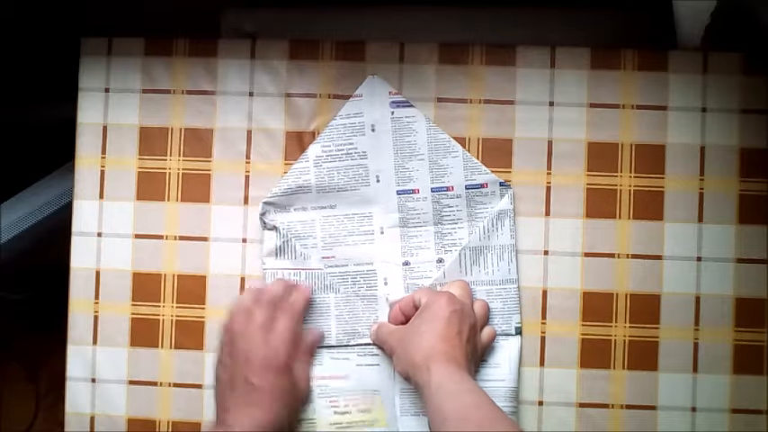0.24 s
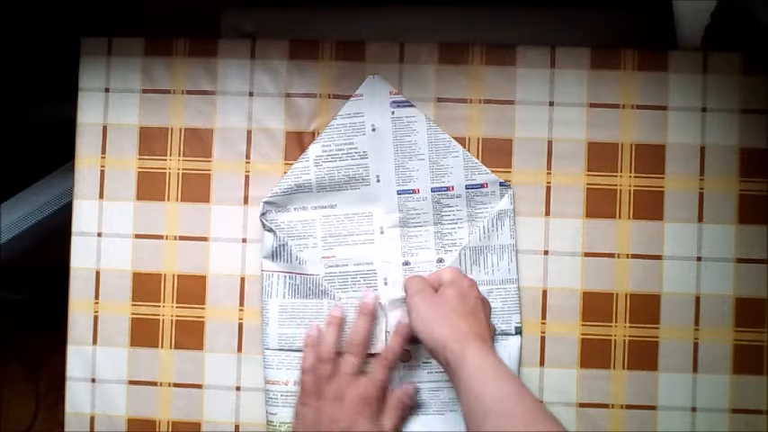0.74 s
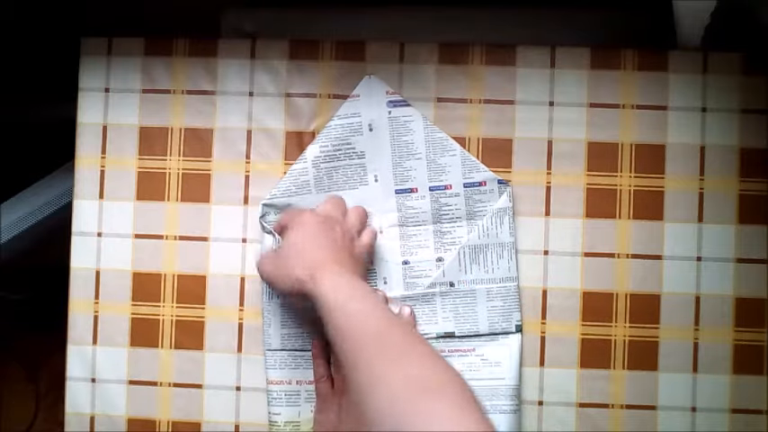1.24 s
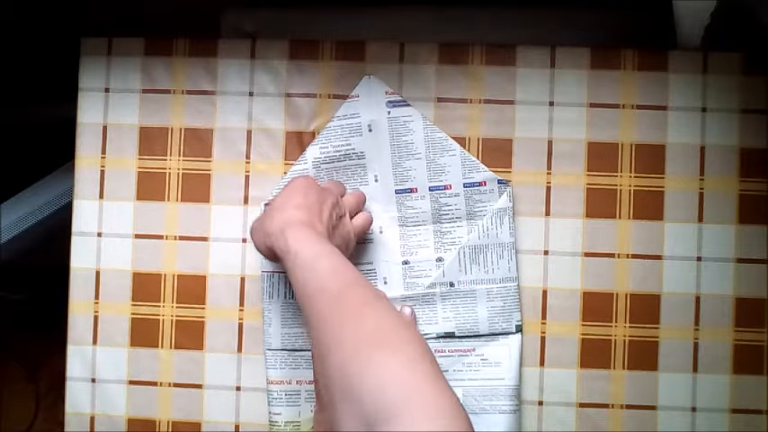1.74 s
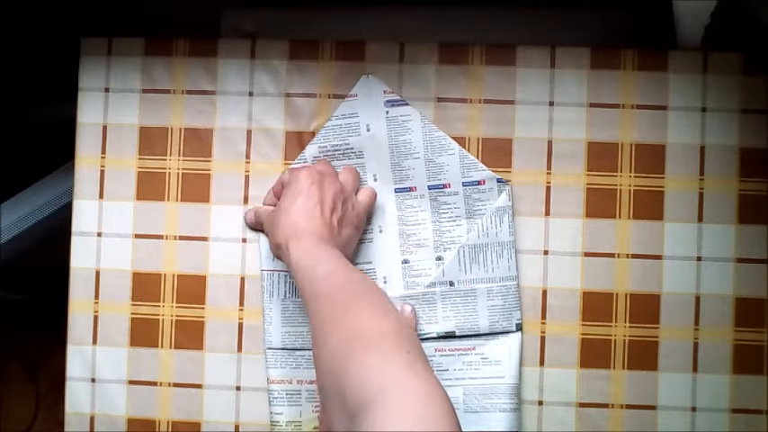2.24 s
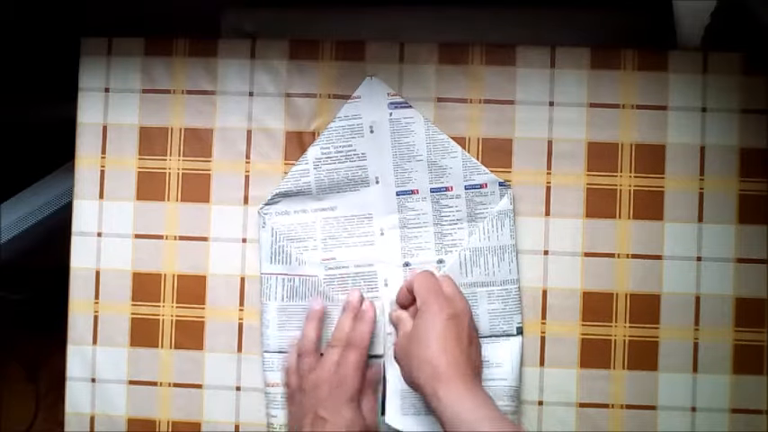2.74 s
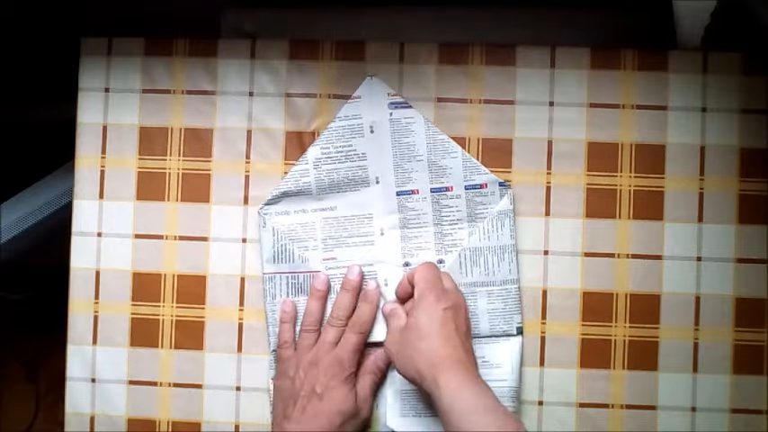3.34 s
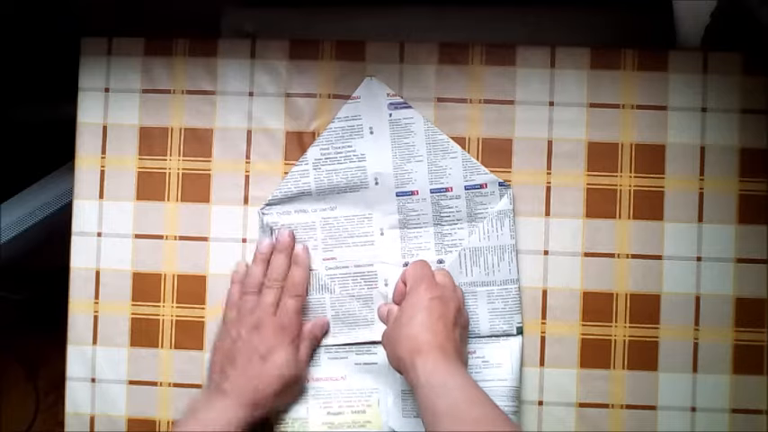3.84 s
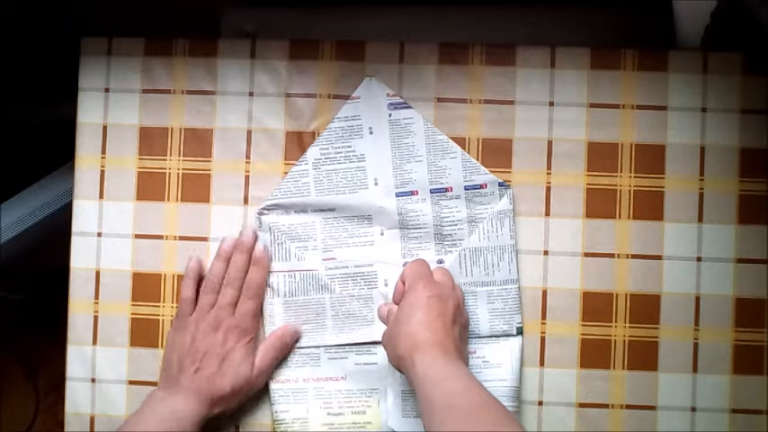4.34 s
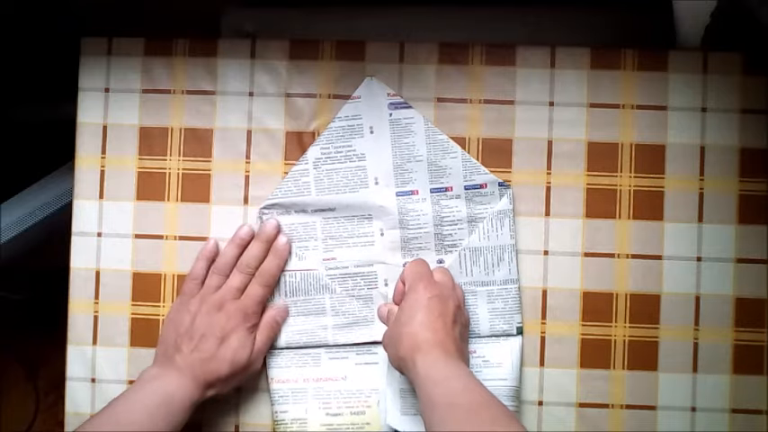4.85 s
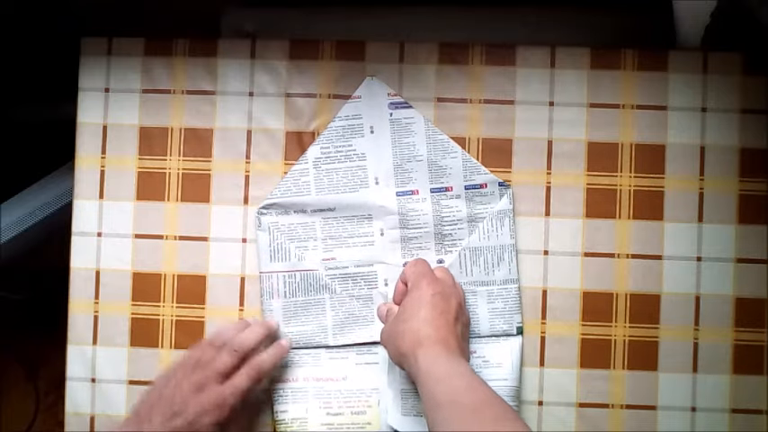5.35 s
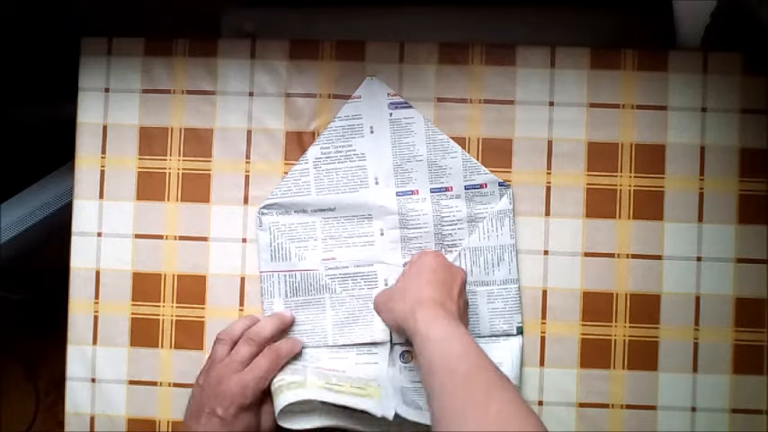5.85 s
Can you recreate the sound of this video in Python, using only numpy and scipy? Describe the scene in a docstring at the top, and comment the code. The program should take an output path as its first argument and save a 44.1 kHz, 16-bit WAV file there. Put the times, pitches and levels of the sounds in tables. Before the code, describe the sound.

Newspaper sheets rustle, crinkle and snap as hands fold and smooth them on a wooden table, with soft thuds in a small room.

```python
"""Paper rustles, crackles and snaps over soft thuds: hands fold and smooth a newspaper on a wooden table.
Sliding palms are bright noise, buckling creases short rings, snaps filtered noise bursts.
Flapping sheets are dull noise with hollow resonances; hands thud and rub on ringing table modes.
A small room adds echoes and a room tone; the microphone is dull above 7 kHz and hisses faintly."""
import sys
import numpy as np
from scipy import signal
from scipy.fft import rfft, irfft, next_fast_len
from scipy.io import wavfile

SR = 44100
rng = np.random.default_rng(int(sys.argv[2]) if len(sys.argv) > 2 else 0)


def transcribe(u):
    """Save the signal u as a 16-bit wav file named by the first command-line argument.

    u: samples, shape (n,) or (channels, n), limited to [-1, 1]; the rate is SR.
    q: integer samples, one column per channel.
    """
    v = np.clip(np.atleast_2d(u).T, -1, 1)
    q = np.round(v * 32767).astype(np.int16)
    wavfile.write(sys.argv[1], SR, q)


N = 268348
TIME_S = np.arange(N) / SR


def from_db(db):
    """Decibels to amplitude gain."""
    return 10 ** (np.asarray(db) / 20)


def rms_one(x):
    """Scale to rms 1."""
    return x / np.sqrt(np.mean(x ** 2) + 1e-20)


def drift(rate_hz):
    """Slow random curve, rms 1: noise through two equal one-pole low-passes, at 1/20 of the sample rate."""
    pole = np.exp(-40 * np.pi * rate_hz / SR)
    noise = rng.standard_normal(N // 20 + 2002)
    slow = signal.lfilter([1], [1, -2 * pole, pole ** 2], noise)[2000:]   # drop the filter's run-in
    return np.interp(np.arange(N) / 20, np.arange(len(slow)), rms_one(slow))


def ring(x, hz, t60_s):
    """Two-pole resonator: a unit click starts a decaying sine of initial height 1."""
    radius = from_db(-60 / (t60_s * SR))
    angle = 2 * np.pi * hz / SR
    poles = [1, -2 * radius * np.cos(angle), radius ** 2]
    return signal.lfilter([0, np.sin(angle)], poles, x + 1e-18)


def band(x, low_hz, high_hz):
    """Butterworth band-pass."""
    return signal.sosfilt(signal.butter(2, [low_hz, high_hz], "band", fs=SR, output="sos"), x)


def coloured(spectrum):
    """Noise of rms 1 whose level per Hz follows the table, interpolated over log frequency."""
    hz, db = np.transpose(spectrum)
    size = next_fast_len(N)
    bins_hz = np.maximum(np.arange(size // 2 + 1) * SR / size, 1)
    shape = from_db(np.interp(np.log(bins_hz), np.log(hz), db, left=-60))
    noise = irfft(rfft(rng.standard_normal(size)) * shape, size)
    return rms_one(noise[:N])


def grains(per_s, spread_db):
    """Random clicks of either sign, in clumps, a few much larger than the rest."""
    size_db = spread_db * np.minimum(rng.exponential(1, N), 3.5)
    sizes = from_db(size_db) * rng.choice([-1, 1], N)
    chance = per_s * from_db(3 * drift(30)) / SR
    return sizes * (rng.random(N) < chance)


# room tone spectrum: (frequency [Hz], relative level per Hz [dB])
ROOM_TONE_SPECTRUM = [(25, -41), (45, -13), (118, 15.5), (240, 11), (560, -23), (1300, -5.5), (3400, -5.5),
                      (7000, -18), (15000, 0.5)]
ROOM_TONE_DB = -63.5


def room_tone():
    """Steady coloured noise of the quiet room."""
    return from_db(ROOM_TONE_DB) * coloured(ROOM_TONE_SPECTRUM)


ROOM_T60_S, ROOM_DB = 0.17, -5
PATTERN_STEP_S = 0.03


def room_echoes(x, count=8):
    """Hands keep moving, so crossfaded echo patterns take turns; each thickens, then dies away."""
    t = np.arange(round(.5 * SR)) / SR
    place = TIME_S / PATTERN_STEP_S % count
    out = 0
    for k in range(count):
        away = np.abs((place - k + count / 2) % count - count / 2)   # steps from this pattern's turn
        share = np.cos(np.pi / 2 * np.minimum(away, 1)) ** 2
        decay = from_db(-60 * t / ROOM_T60_S) * np.clip(t / 0.0024, 0, 1)
        echoes = band(rng.standard_normal(len(t)) * decay, 324, 13100)
        unit_energy = echoes / np.sqrt(np.sum(echoes ** 2))
        out = out + signal.fftconvolve(x * share, unit_energy)[:N]
    return from_db(ROOM_DB) * out


# table top modes: (frequency [Hz], relative level [dB], t60 [s])
TABLE_MODES = [(121.5, -2, 0.23), (170.3, -4.5, 0.11), (75, -27, 0.14), (230, -19, 0.51),
               (302.2, 6.5, 0.11), (331, -0.5, 0.085), (472, 1.5, 0.042)]
UPPER_MODES_HZ = 200   # modes above this depend on how hard the hand is
# hands rubbing the table top: (time [s], rumble level [dB])
RUB_LEVELS = [(0.0, -53), (0.12, -49), (0.39, -57), (0.57, -60), (0.69, -63.5), (0.91, -74), (1.18, -66),
              (1.32, -68), (1.4, -54.5), (1.49, -64), (1.61, -68), (2.01, -74.5), (2.25, -62), (2.4, -58.5),
              (2.45, -69), (2.52, -56.5), (2.64, -54.5), (2.69, -69.5), (3.2, -68), (3.37, -76),
              (3.67, -66), (3.79, -63), (3.94, -62.5), (4.18, -50.5), (4.42, -55), (4.54, -62),
              (4.77, -71.5), (5.13, -53.5), (5.27, -62), (5.64, -62), (5.72, -70), (5.98, -63.5),
              (6.08, -78)]


def table_rumble():
    """Uneven rubbing of the hands, swelling and fading, rings the table modes, the upper ones weakly."""
    rubbing = rng.standard_normal(N) * from_db(3.6 * drift(15))
    rumble = 0
    for hz, db, t60_s in TABLE_MODES:
        gain_db = db - 14.4 * (hz > UPPER_MODES_HZ)
        rumble = rumble + from_db(gain_db) * ring(rubbing, hz, t60_s)
    level_db = np.interp(TIME_S, *np.transpose(RUB_LEVELS))
    return from_db(level_db) * rms_one(rumble)


# hands landing: (time [s], strike level before mode gains [dB], hardness: relative upper-mode drive [dB])
LANDINGS = [(0.016, -29, -11.5), (0.201, -40.5, -9), (0.27, -42.5, -11), (0.452, -43, -6.5),
            (0.656, -52, -19), (1.326, -44, -17.5), (1.571, -52.5, -11), (1.947, -52.5, -13),
            (2.253, -46.5, -7), (2.417, -48, -34), (2.475, -43, -37), (2.558, -36.5, -21.5),
            (2.899, -34.5, -21), (2.914, -36, -35), (3.323, -54, -28), (3.832, -48.5, -34),
            (4.008, -36, -28), (4.044, -42, -20.5), (4.23, -42.5, -22), (4.27, -42, -36), (4.322, -38, -26),
            (4.548, -42.5, -35), (5.009, -39, -23.5), (5.17, -43.5, -23), (5.226, -43, -27),
            (5.438, -44.5, -22), (5.464, -45.5, -21), (5.665, -52.5, -20), (5.98, -52.5, -6)]


def table_thuds():
    """Soft pushes ring the table modes; hard landings wake the upper ones more."""
    time_s, strike_db, hardness_db = np.transpose(LANDINGS)
    at = np.round((time_s - .004) * SR).astype(int)   # start 4 ms early, as the band-pass delays the thud
    luck = rng.standard_normal((len(LANDINGS), len(TABLE_MODES)))
    thuds = 0
    for k, (hz, db, t60_s) in enumerate(TABLE_MODES):
        upper_db = (hardness_db + 4.5) * (hz > UPPER_MODES_HZ)
        clicks = np.zeros(N)
        clicks[at] = from_db(strike_db + db + 3.3 * luck[:, k] + upper_db)
        thuds = thuds + (-1) ** k * ring(clicks, hz, t60_s)   # neighbouring modes start in opposite directions
    return band(thuds, 75, 400)   # flesh pushes softly; a small top radiates no deep bass


# fingertip dragging a hollow fold: (start [s], end [s], frequency [Hz], level before the swell [dB])
FOLD_DRAG = (5.515, 5.63, 490, -64)


def fold_drag():
    """Rubbing noise sings in the air pocket under a fold dragged along the table."""
    start_s, end_s, hz, level_db = FOLD_DRAG
    progress = np.clip((TIME_S - start_s) / (end_s - start_s), 0, 1)
    swell = np.sin(np.pi * progress) ** .5
    return from_db(level_db) * swell * rms_one(ring(rng.standard_normal(N), hz, 0.052))


# one rustle per hand move:
# (peak [s], rise [s], fall [s], slide level [dB], crinkle level [dB], flutter level [dB])
HAND_MOVES = [(0.025,0.12,0.069,-52.5,-50.5,-52), (0.066,0.015,0.13,-42,-43.5,-50),
              (0.163,0.057,0.057,-38.5,-42.5,-51.5), (0.213,0.092,0.1,-78,-58.5,-55.5),
              (0.274,0.027,0.097,-52,-78,-55), (0.4,0.0044,0.6,-47,-49,-67),
              (0.425,0.017,0.11,-38,-31.5,-42), (0.45,0.0081,0.043,-29.5,-31,-50),
              (0.472,0.034,0.061,-26.5,-39,-47.5), (0.656,0.02,0.1,-42.5,-45,-69),
              (0.781,0.004,0.14,-50,-52.5,-74), (0.848,0.057,0.11,-53.5,-49.5,-57.5),
              (0.994,0.16,0.2,-64,-55,-69), (1.099,0.096,0.074,-50.5,-65,-80),
              (1.316,0.052,0.17,-47.5,-51.5,-57), (1.414,0.12,0.3,-48.5,-54,-75),
              (1.577,0.056,0.065,-39.5,-46.5,-54), (1.686,0.39,0.043,-79,-55.5,-75),
              (1.786,0.39,0.15,-53.5,-55.5,-74.5), (1.898,0.01,0.092,-49,-55,-76),
              (1.962,0.042,0.06,-45.5,-48.5,-60.5), (2.03,0.046,0.23,-62.5,-61,-74),
              (2.204,0.0069,0.11,-46,-70,-80), (2.242,0.039,0.12,-41.5,-46.5,-53),
              (2.343,0.05,0.12,-46,-50,-66), (2.438,0.011,0.059,-45,-43,-75),
              (2.564,0.22,0.065,-46,-52,-57), (2.7,0.1,0.1,-52,-57.5,-71), (2.828,0.017,0.13,-48,-52,-86),
              (2.875,0.01,0.82,-53,-52,-66), (2.97,0.037,0.18,-76,-67,-53), (3.086,0.032,0.34,-53,-65,-79),
              (3.225,0.095,0.048,-66,-59,-61), (3.36,0.094,0.16,-46,-52,-59),
              (3.479,0.14,0.092,-55.5,-56.5,-76), (3.571,0.037,0.084,-50.5,-58,-87),
              (3.68,0.027,0.25,-54,-70,-85), (3.757,0.01,0.26,-54.5,-61,-82),
              (3.877,0.31,0.134,-58,-52.5,-65), (3.965,0.0095,0.083,-36.5,-37.5,-45),
              (3.991,0.041,0.038,-32,-32,-45), (4.102,0.13,0.14,-43.5,-47.5,-53.5),
              (4.212,0.038,0.036,-38,-47,-56), (4.268,0.085,0.029,-38.5,-41.5,-57),
              (4.329,0.052,0.076,-82,-50.5,-49), (4.426,0.11,0.22,-50,-59,-73),
              (4.504,0.12,0.14,-45,-58,-59), (4.597,0.091,0.13,-47.5,-72,-91),
              (4.69,0.013,0.03,-41.5,-44,-78), (4.83,0.31,0.14,-48,-49.5,-71),
              (4.888,0.0081,0.022,-48,-63.5,-58), (5.004,0.023,0.051,-41,-40,-57),
              (5.068,0.048,0.085,-45,-45.5,-51), (5.168,0.033,0.112,-48,-48,-73),
              (5.325,0.096,0.15,-48,-81,-84), (5.431,0.19,0.026,-55.5,-53,-56),
              (5.515,0.4,0.18,-71,-76,-65), (5.584,0.0085,0.18,-53,-63,-77), (5.762,0.2,0.27,-54,-57,-88),
              (5.916,0.03,0.2,-47.5,-49.5,-71), (5.985,0.0047,0.05,-34,-40.5,-54),
              (6.029,0.037,0.053,-42,-45.5,-57)]
SWELL_DB = 20   # climb over the rise time, drop over the fall time


def rustle_levels_db():
    """Slide, crinkle and flutter levels: each rustle swells and dies away; overlaps add their power."""
    t = np.arange(0, N + 64, 64) / SR
    peak_s, rise_s, fall_s, *peak_levels_db = np.transpose(HAND_MOVES)[:, :, None]
    before = (peak_s - t) / np.maximum(rise_s, .003)
    after = (t - peak_s) / np.maximum(fall_s, .003)
    swell_db = -SWELL_DB * np.maximum(before, after)
    powers = [np.sum(from_db(2 * (swell_db + db)), axis=0) for db in peak_levels_db]
    return [np.interp(TIME_S, t, 10 * np.log10(power + 1e-12)) for power in powers]


# paper resonances on the table top: (frequency [Hz], relative level [dB], t60 [s])
SHEET_MODES = [(508, -9.5, 0.043), (668, -6.5, 0.044), (822, 7.5, 0.029)]


def flutter(level_db):
    """Whole sheets flap and drag: dull, lumpy noise that wakes a few hollow resonances."""
    noise = rng.standard_normal(N)
    hollow = 0
    for hz, db, t60_s in SHEET_MODES:
        hollow = hollow + from_db(db + 5.9 * drift(17)) * rms_one(ring(noise, hz, t60_s))
    dull = rms_one(band(noise, 230, 950))
    return from_db(level_db + 1.5 * drift(30)) * rms_one(dull + from_db(-2) * hollow)


# sliding noise spectrum: (frequency [Hz], relative level per Hz [dB])
SLIDE_SPECTRUM = [(1500, -5), (2500, 1.5), (3500, 1), (4500, -7.5), (6000, 7.5), (6700, 5), (9000, -17),
                  (15000, 3.5)]


def slide(level_db):
    """Skin rubs over paper fibres: bright noise that catches and slips, with fine ticks."""
    ticks = rms_one(band(grains(per_s=1500, spread_db=2.5), 2730, 17800))
    catch_and_slip = from_db(level_db + 2.45 * drift(51))
    return catch_and_slip * (coloured(SLIDE_SPECTRUM) + from_db(0.5) * ticks)


# buckle pitch weighting: (frequency [Hz], relative level [dB])
CREASE_SPECTRUM = [(700, -30.5), (950, -16), (1300, -0.5), (1600, -1.5), (1950, 4), (2400, -5.5),
                   (3000, -13.5), (3700, -0.5), (4600, 5)]
GRAINS_PER_S, GRAIN_SPREAD_DB = 2500, 3
GRAIN_CYCLES = 12.1   # cycles per 60 dB of decay


def crinkle(level_db):
    """Tiny buckles ring a few cycles, each at one of 24 pitches; favoured pitches wander as the sheet bends."""
    clicks = grains(GRAINS_PER_S, GRAIN_SPREAD_DB)
    hz, db = np.transpose(CREASE_SPECTRUM)
    pitches_hz = np.geomspace(hz[0], hz[-1], num=24)
    dealt = rng.integers(0, 24, N)   # pitch index for each click
    gains = from_db(np.interp(np.log(pitches_hz), np.log(hz), db))
    rings = 0
    for k, (pitch_hz, gain) in enumerate(zip(pitches_hz, gains)):
        buckles = ring(clicks * (dealt == k), pitch_hz, GRAIN_CYCLES / pitch_hz)
        rings = rings + gain * from_db(2.43 * drift(11.2)) * buckles
    return from_db(level_db) * rms_one(rings)


# creases snapping: (time [s], body peak level [dB], pitch [Hz], early edge rms relative to body peak [dB])
CREASE_SNAPS = [(0.0194, -31, 1180, -21), (0.0593, -32, 1590, -6.5), (0.1386, -36, 2260, -12),
                (0.156, -29, 2500, -7.5), (0.4035, -31.5, 1600, -13), (0.4234, -23, 1250, -18),
                (0.4489, -11, 2120, -20), (0.4544, -29, 1980, -10), (0.4694, -28, 2200, -10),
                (0.4934, -21.5, 2920, -11.5), (0.5442, -32, 1470, -18), (0.6494, -21, 3380, -16),
                (0.7741, -43, 1800, -13), (0.8515, -37, 1060, -14), (0.9817, -34.5, 3900, -18),
                (1.047, -43, 1500, -13), (1.0889, -41, 1800, -13), (1.277, -38, 1870, -18),
                (1.3144, -36, 1740, -13), (1.5718, -34, 1500, -1), (1.8971, -30, 2800, -18),
                (1.95, -34, 3620, -26), (1.9629, -35.5, 2230, -3.5), (2.1979, -47, 3700, -8),
                (2.2463, -29.5, 1240, -13), (2.3376, -33, 3040, -21), (2.4354, -21, 3340, -14),
                (2.5192, -37, 1760, -11), (2.6718, -39, 1640, -24), (2.6994, -36, 3900, -9),
                (2.8255, -34.5, 2040, -10.5), (2.8754, -34.5, 2020, -13), (2.9114, -31, 2990, -12),
                (2.9632, -35.5, 1300, -24), (3.0121, -36.5, 1240, -20), (3.083, -40, 2070, -11.5),
                (3.2191, -30.5, 1200, -37), (3.2816, -38, 1340, -22), (3.3204, -33.5, 2390, -11),
                (3.3303, -34.5, 1890, -9.5), (3.3677, -33.5, 1330, -3.5), (3.6745, -47, 3630, -10),
                (3.8686, -38.5, 1190, -7), (3.9624, -37, 1460, -4), (3.9724, -24.5, 1400, -9),
                (3.9924, -29.5, 1330, -15), (4.0951, -22.5, 3140, -24), (4.1284, -27.5, 3820, -21),
                (4.1969, -46, 1320, -3), (4.2467, -25.5, 3700, -17), (4.2602, -19.5, 3680, -19),
                (4.3231, -26.5, 1590, -33), (4.4912, -31, 2050, -13), (4.5254, -31, 3980, -16),
                (4.5935, -40, 2500, -4), (4.6862, -32, 1980, -12), (4.7568, -41.5, 1260, -4),
                (4.7915, -35.5, 1470, -13), (4.8868, -36, 2060, -4.5), (4.9879, -42, 1660, -3),
                (4.9995, -30.5, 2500, -13), (5.0514, -35, 1570, -9), (5.0644, -32, 1800, -11),
                (5.1617, -32.5, 1680, -10.5), (5.3178, -31.5, 4000, -20), (5.4211, -33, 2040, -24),
                (5.5852, -37, 2800, -19), (5.9065, -37.5, 1970, -9), (5.9843, -29, 3520, -19)]
SNAP_T60_S = 0.023


def snaps():
    """A crease gives way: a click and short spray, heard as a broad band at its pitch plus a bright edge."""
    size = 4096
    out = np.zeros(N + size)
    decay = from_db(-60 * np.arange(size) / SR / SNAP_T60_S)
    click = from_db(20.5) * (np.arange(size) == 8)
    for time_s, peak_db, hz, edge_db in CREASE_SNAPS:
        burst = rng.standard_normal(size) * decay + click
        body = band(burst, hz / 1.464, hz * 1.52)
        edge = band(burst, 5270, 7700)
        both = body / np.abs(body).max() + from_db(edge_db) * edge / np.std(edge[:200])
        at = round(time_s * SR)
        out[at:at + size] += from_db(peak_db) * both
    return out[:N]


def scene():
    """Paper with its echoes, table and room tone, as one channel."""
    slide_db, crinkle_db, flutter_db = rustle_levels_db()
    paper = slide(slide_db) + crinkle(crinkle_db) + flutter(flutter_db) + snaps() + fold_drag()
    table = table_thuds() + table_rumble()
    return (paper + room_echoes(paper) + table + room_tone())[None]


MIC_HZ, CUTOFF_HZ = 6706, 15480
HISS_DB = -87.5


def record(dry):
    """Microphone: steep treble loss, slight squaring distortion, deep-bass cut, circuit hiss, top cut."""
    dull = signal.sosfilt(signal.butter(12, MIC_HZ, fs=SR, output="sos"), dry)
    leak = from_db(-33) * band(dry, 6600, 9220)   # a little treble gets past
    bent = from_db(-1) * band(dull ** 2, 6600, 12400)   # the lopsided capsule adds sum tones in the treble
    bass_cut = signal.butter(2, 42, "high", fs=SR, output="sos")
    hiss = from_db(HISS_DB) * rng.standard_normal(dry.shape)
    heard = signal.sosfilt(bass_cut, dull + leak + bent) + hiss
    top_cut = signal.cheby2(16, 40, CUTOFF_HZ + 250, fs=SR, output="sos")
    return signal.sosfilt(top_cut, heard)


dry = scene()
out = record(dry)
transcribe(out)
```